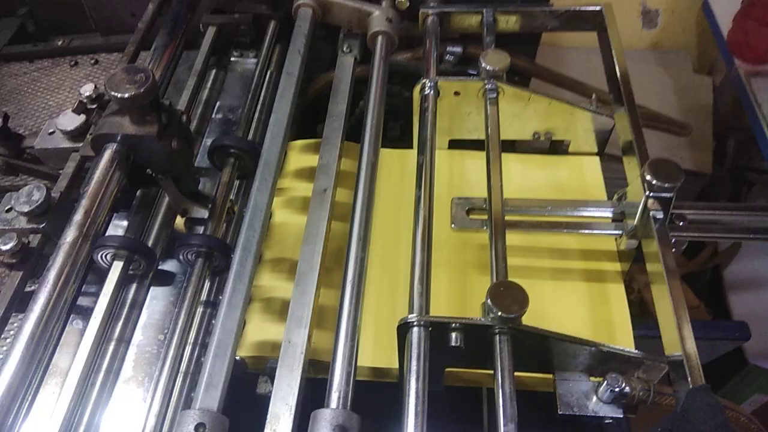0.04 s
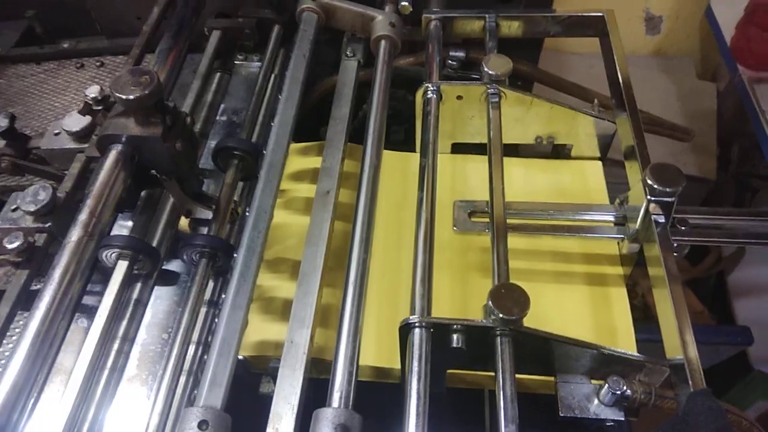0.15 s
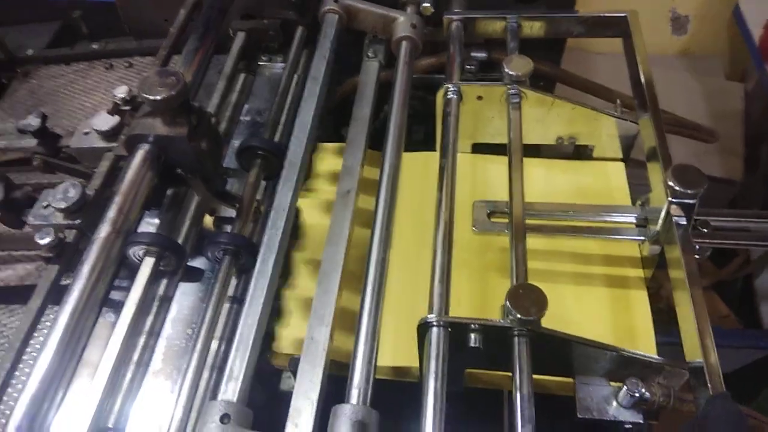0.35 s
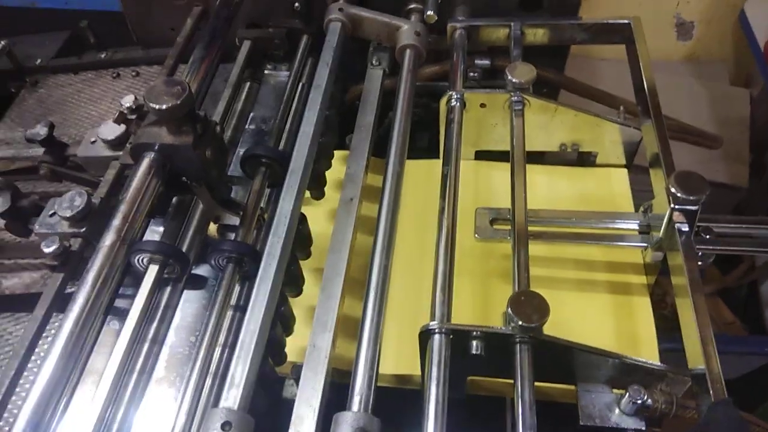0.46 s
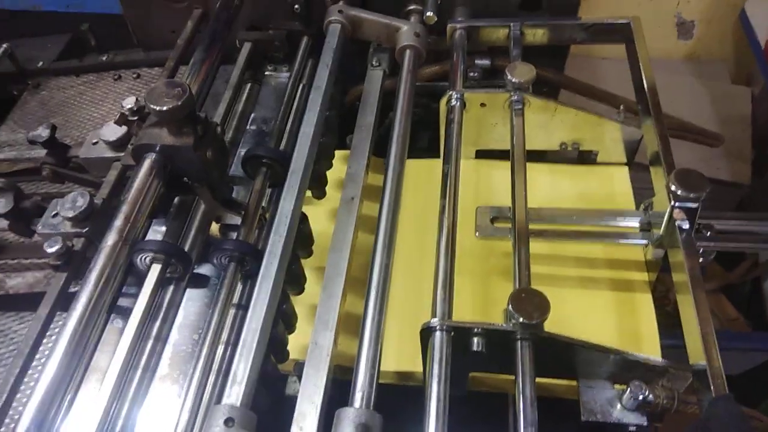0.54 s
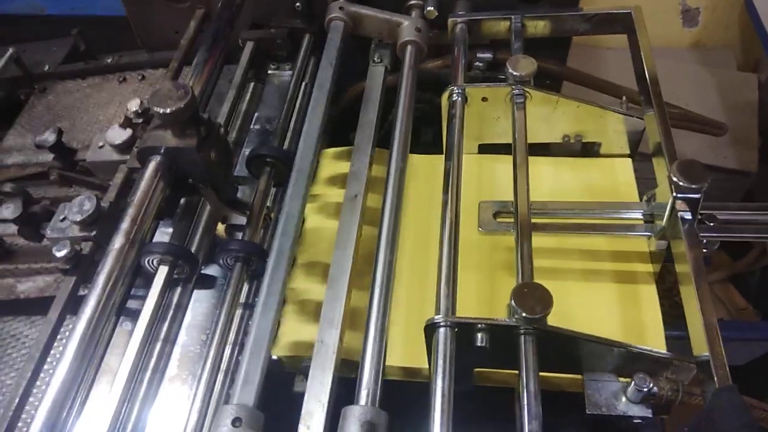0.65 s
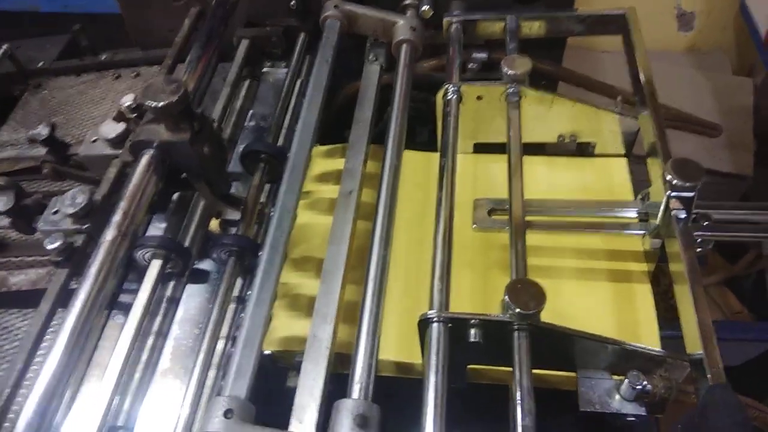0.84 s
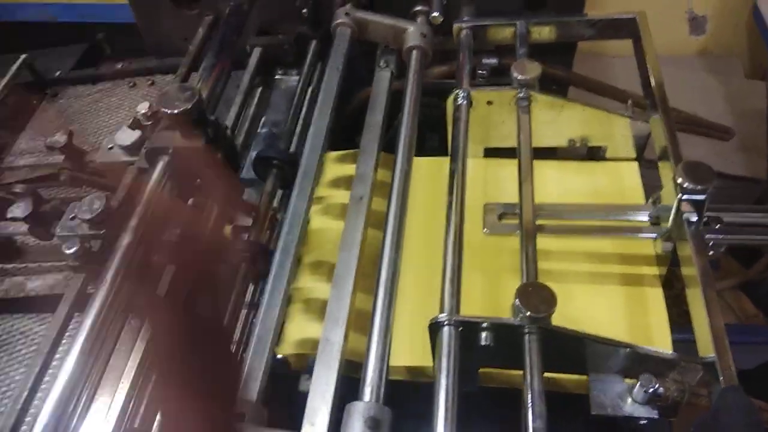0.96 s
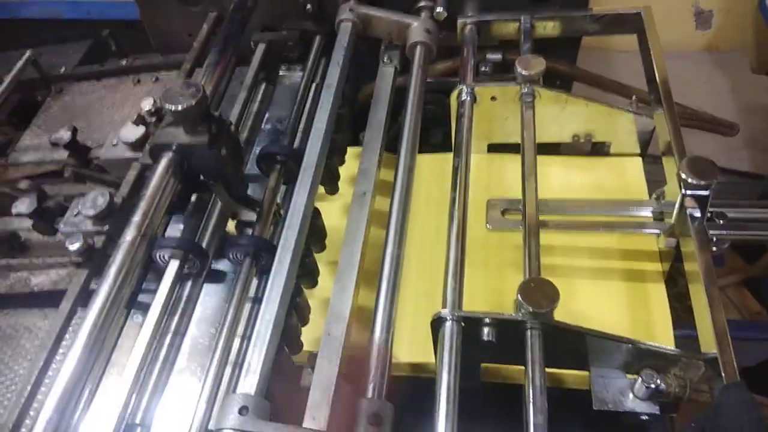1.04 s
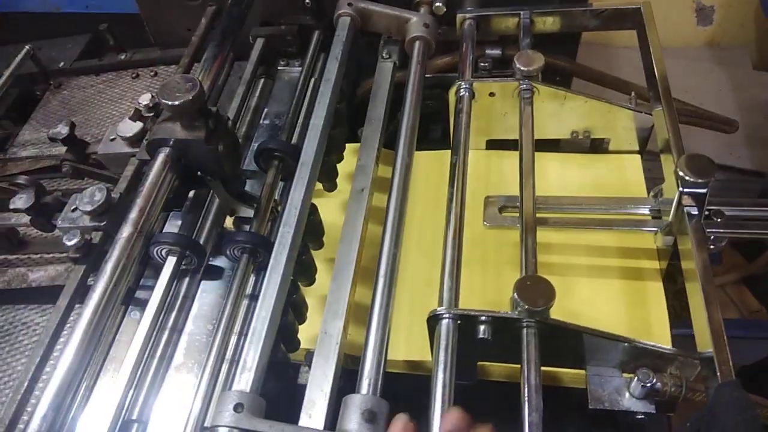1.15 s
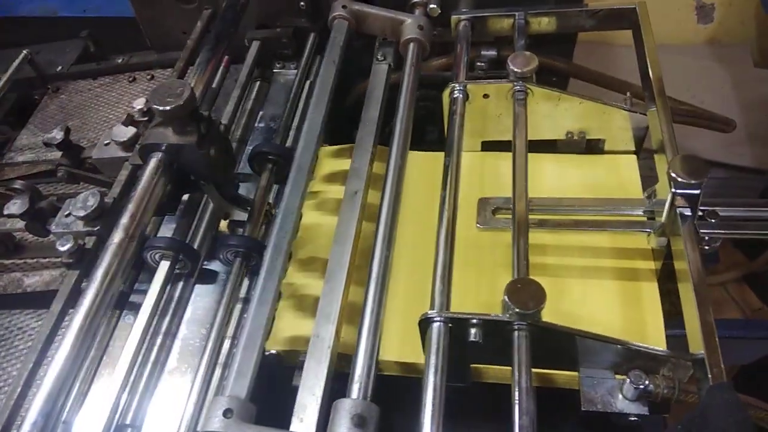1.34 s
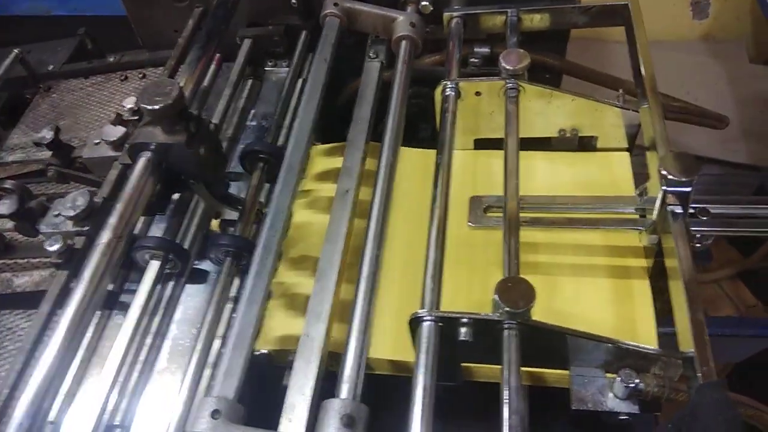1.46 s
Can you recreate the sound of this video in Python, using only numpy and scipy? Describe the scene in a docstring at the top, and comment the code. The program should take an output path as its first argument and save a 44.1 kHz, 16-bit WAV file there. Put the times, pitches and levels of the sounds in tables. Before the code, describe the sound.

An offset press feeder draws air with a pulsing buzz, cuts off, clanks and fades

```python
"""In a print shop, close by the sheet feeder of an offset press, through one feeding cycle.
Up front the suckers draw air: pulsing noise and vane-pump harmonics, then a hollow ring as they close.
The sheet slides in as fluttering bands of noise; levers clunk and ring, small steel parts tick in
noise bursts, and dry pivots squeak as unsteady gliding tones.
Behind them lie short shop reflections of the steel and the steady noise of the running drive."""
import sys
import numpy as np
from scipy import signal
from scipy.fft import rfft, irfft
from scipy.io import wavfile

SR = 44100
rng = np.random.default_rng(int(sys.argv[2]) if len(sys.argv) > 2 else 0)


def inscribe(sig):
    """Save sig as 16-bit PCM at rate SR to the path in sys.argv[1].

    A 1-D sig is mono; a 2-D sig holds one channel per row.
    Samples are clipped to [-1, 1] before scaling.
    """
    pcm = np.round(np.clip(np.atleast_2d(sig).T, -1, 1) * 32767)
    wavfile.write(sys.argv[1], SR, pcm.astype(np.int16))


N = 66150
TIME = np.arange(N) / SR  # [s]

# Vane pump harmonics, against each other: (multiple of vane rate, level [dB])
PUMP_HARMONICS = [(1, -12.5), (2, 0), (3, 2.5), (4, -3), (5, -7.5), (6, -16), (7, -11.5), (8, -12.5)]
# Air drawn through the suckers: (time [s], level [dB])
SUCTION_FLOW = [(.07, -20.5), (.1, -7), (.2, -1.5), (.26, 2), (.35, 2), (.5, 4.5), (.62, 2), (.68, 3.5),
                (.725, 1), (.76, -28.5), (.85, -47.5), (.95, -61)]
# Spectrum of the rushing air: (frequency [Hz], density [dB per Hz])
RUSH_SPECTRUM = [(40, -30), (110, -28), (150, -18), (185, -6), (250, -7), (380, 3.5), (680, 1.5),
                 (1050, -2), (1400, 1.5), (1800, -2.5), (2300, 1), (3300, -3), (4400, 1), (4900, -0.5),
                 (5900, 0), (7500, -4)]
# Tubes and plates ringing in the air stream: (frequency [Hz], width [Hz], level at 0 dB flow [dB])
PLATE_RESONANCES = [(277.7, 22, -41), (394, 19, -37), (473, 28, -40.5), (1268, 35, -41.5), (1499, 14, -38),
                    (2163, 66, -38.5), (2300, 180, -38.5), (2870, 12, -39), (4275, 13, -36.5),
                    (5660, 30, -37), (5880, 25, -44)]
# Pump hum through the frame, before its load: (multiple of vane rate, level [dB])
HUM_HARMONICS = [(2, -56), (3, -55)]
# Hum following the load on the pump: (time [s], level [dB])
HUM_LOAD_LEVEL = [(.8, -3), (.97, 5), (1.02, 1.5), (1.11, 6.5), (1.16, -6), (1.2, 4), (1.225, -15),
                  (1.3, 0), (1.5, -5.5)]
# Hollow ring of the air line as the suckers close: (time [s], level [dB])
CLOSING_LEVEL = [(.66, -71), (.715, -35), (.78, -32), (.84, -50.5), (.95, -66)]
# Blower hiss: (time [s], level [dB])
BLOWER_LEVEL = [(.07, -46), (.7, -17), (.8, -23), (.9, -26), (1.0, -32.5), (1.08, -25.5), (1.13, -25.5),
                (1.18, -26), (1.21, -35.5), (1.31, -36), (1.39, -47), (1.43, -37), (1.5, -43.5)]
# Spectrum of the hiss: (frequency [Hz], density [dB per Hz])
HISS_SPECTRUM = [(200, -28.5), (500, -15), (1000, -10), (1420, -8), (1750, -8), (2300, -5), (3500, -0.5),
                 (4300, 0.5), (4900, 0.5), (5800, 5.5), (7500, -2)]
# Sheet rubbing over the feed board: (time [s], level [dB])
SLIDE_LEVEL = [(.74, -55.5), (.82, -28), (.88, -28), (.92, -22), (.96, -24), (1.0, -28.5), (1.06, -28.5),
               (1.09, -45.5), (1.2, -45.5)]
# Spectrum of the rubbing paper: (frequency [Hz], density [dB per Hz])
PAPER_SPECTRUM = [(600, -40.5), (2000, -13.5), (2800, -8), (3400, -3), (3780, 3), (4100, -8), (7000, -16.5)]
# Lever clunks: (time [s], level [dB], 60 dB decay [s], low thud against the clank [dB])
LEVER_CLUNKS = [(0.078, -29.5, 0.46, -22), (0.436, -22, 0.045, 7), (.465, -19.5, 0.11, -32.5),
                (0.661, -19, .1, -3), (0.677, -31.5, 0.15, 8.5), (0.713, -18.5, 0.19, -7.5),
                (0.807, -30, 0.14, -17), (1.091, -19, 0.22, -25.5), (1.131, -34.5, 0.19, -32),
                (1.231, -40, 0.6, -19), (1.285, -30, 0.25, -12), (1.331, -33, 0.23, -20),
                (1.342, -31.5, 0.11, -11)]
# Spectrum of the clank: (frequency [Hz], density [dB per Hz])
CLANK_SPECTRUM = [(300, -32), (850, -24), (1080, -13.5), (1280, -15.5), (1650, -3.5), (2250, -3.5),
                  (2800, -8), (3600, -11), (4500, -18), (7500, -32)]
# Spectrum of the thud: (frequency [Hz], density [dB per Hz])
THUD_SPECTRUM = [(100, -39.5), (330, -4), (550, -8), (720, 4.5), (880, -19), (1300, 0), (2000, -29.5),
                 (6000, -57)]
# Ringing modes of a lever, against each other: (frequency [Hz], level [dB], 60 dB decay [s])
LEVER_MODES = [(537, -13, 0.23), (688, -12.5, 0.058), (1082, -12, 0.21), (1640, -15.5, 0.13),
               (1863, -9.5, 0.05), (1960, -11.5, 0.13), (2210, -8, .15), (2254, -0.5, 0.16),
               (2422, -1, 0.1), (2630, -12.5, .2)]
# Ticks of small steel parts: (time [s], level [dB])
STEEL_TICKS = [(0.244, -20), (.287, -26), (.316, -18.5), (.385, -17.5), (.846, -24.5), (.906, -25.5),
               (.924, -22.5), (1.04, -29.5), (1.055, -25), (1.157, -22.5), (1.173, -25.5), (1.408, -32.5)]
# Spectrum of a tick: (frequency [Hz], density [dB per Hz])
TICK_SPECTRUM = [(800, -36), (2500, -29.5), (3400, -5.5), (3640, -23.5), (3770, -1), (3950, -13),
                 (4350, -10.5), (4900, -24.5), (7500, -30.5)]
# Squeaks of dry pivots: (time [s], length [s], first pitch [Hz], last pitch [Hz], level [dB])
PIVOT_SQUEAKS = [(.237, 0.13, 3775, 3755, -26.5), (0.359, 0.074, 3700, 3736, -24.5),
                 (0.468, 0.029, 2335, 2316, -18.5), (0.709, 0.029, 1450, 1453, -20.5),
                 (0.767, 0.055, 1660, 1628, -30.5), (0.794, 0.053, 1010, 1016, -38),
                 (1.24, 0.06, 2423, 2250, -37.5), (1.341, 0.073, 1858, 1629, -36.5),
                 (1.436, 0.04, 2303, 2210, -45)]
# Spectrum of the running drive: (frequency [Hz], density [dB per Hz])
DRIVE_SPECTRUM = [(25, -20), (75, -20), (110, -14.5), (160, -22), (230, -7), (380, -2), (650, -2),
                  (1000, -6.5), (2300, -2.5), (7000, -26)]
# Microphone response: (frequency [Hz], gain [dB])
MIC_RESPONSE = [(20, -8.5), (3850, -1), (4010, -10.5), (4200, -3.5), (6300, -4.5), (6900, -8),
                (7400, -15.5), (7800, -36), (8200, -67)]

PUMP_HZ, PUMP_WOBBLE = 180.6, 0.0036  # vane rate and its rms unsteadiness, as a fraction
BUZZ_DB, BUZZ_GROWTH = -27.5, 1.72  # level at 0 dB flow; power of the flow
RUSH_DB, RUSH_PULSING = -17, 0.15  # level at 0 dB flow; depth of the vane pulses
CLOSING_HZ, CLOSING_WANDER_HZ = 362, 7.4  # pitch and its rms wander
CLUNK_RISE_S, RING_DB = .009, -3  # the ring's level is against the clank
TICK_RISE_S, TICK_T60_S = .005, .06
SQUEAK_JITTER = 0.02  # rms pitch unsteadiness, as a fraction
ROOM_T60_S, ROOM_DB = 0.16, -9.5
DRIVE_DB = -47
BASS_CUT_HZ = 130
START_S, FADE_S, MIC_EDGE_HZ = .069, .0023, 8100


def pump():
    """Vanes buzz and pulse the air rushing into the suckers; hum follows and the closing air line rings."""
    vane_hz = PUMP_HZ * (1 + PUMP_WOBBLE * drift(rate_hz=35))
    phase = 2 * np.pi * np.cumsum(vane_hz) / SR
    flow = level(SUCTION_FLOW)

    buzz = unit(harmonics(phase, PUMP_HARMONICS)) * amp(0.66 * drift(rate_hz=25))
    vane_pulses = 1 + RUSH_PULSING * np.cos(phase)
    rush = noise(RUSH_SPECTRUM, vane_pulses * amp(0.89 * drift(rate_hz=270)))

    closing_hz = CLOSING_HZ + CLOSING_WANDER_HZ * drift(rate_hz=56)
    ring = np.sqrt(2) * np.sin(2 * np.pi * np.cumsum(closing_hz) / SR)

    # the buzz grows faster than the flow, so it stands out when the suction is strong
    suction = amp(BUZZ_DB) * flow ** BUZZ_GROWTH * buzz
    suction += flow * (amp(RUSH_DB) * rush + plates())
    hum = harmonics(phase, HUM_HARMONICS) * level(HUM_LOAD_LEVEL)
    return suction + hum + level(CLOSING_LEVEL) * ring


def harmonics(phase, orders):
    """Sums cosines locked to the vane rate, each at its rms level and a random phase."""
    out = np.zeros(N)
    for multiple, db in orders:
        start_phase = 2 * np.pi * rng.random()
        out += np.sqrt(2) * amp(db) * np.cos(round(multiple) * phase + start_phase)
    return out


def plates():
    """Turbulence, as white noise, keeps the narrow resonances of tubes and plates ringing."""
    f = np.fft.rfftfreq(N, 1 / SR)
    out = np.zeros(N)
    for hz, width_hz, db in PLATE_RESONANCES:
        resonance = 1 / (1 + (2 * (f - hz) / width_hz) ** 2)
        out += amp(db) * unit(irfft(rfft(rng.standard_normal(N)) * resonance, N))
    return out


def sheet():
    """Blower air flutters the pile as uneven hiss while the top sheet scrapes forward."""
    hiss = noise(HISS_SPECTRUM, amp(1.6 * drift(rate_hz=130)))
    scrape = noise(PAPER_SPECTRUM, amp(2.2 * drift(rate_hz=300)))
    return level(BLOWER_LEVEL) * hiss + level(SLIDE_LEVEL) * scrape


def levers():
    """Each lever lands with a noisy clank, a thud in the frame and a short ring of its steel modes."""
    out = np.zeros(N)
    for start, db, t60, thud_db in LEVER_CLUNKS:
        impact = noise(CLANK_SPECTRUM) + amp(thud_db) * noise(THUD_SPECTRUM)
        clank = impact * blow(start, CLUNK_RISE_S, t60)
        ring = np.zeros(N)
        for hz, mode_db, mode_t60 in LEVER_MODES:
            tone = np.sin(2 * np.pi * (hz * TIME + rng.random()))
            ring += amp(mode_db) * blow(start, CLUNK_RISE_S, mode_t60) * tone
        out += amp(db) * (clank + amp(RING_DB) * ring)
    return out


def ticks():
    """Small steel parts strike with a bright, quickly damped burst of noise."""
    out = np.zeros(N)
    for start, db in STEEL_TICKS:
        out += amp(db) * noise(TICK_SPECTRUM) * blow(start, TICK_RISE_S, TICK_T60_S)
    return out


def squeaks():
    """A dry pivot sticks and slips: an unsteady tone that swells quickly, glides in pitch and dies."""
    out = np.zeros(N)
    for start, length, first_hz, last_hz, db in PIVOT_SQUEAKS:
        progress = np.clip((TIME - start) / length, 0, 1)
        glide_hz = first_hz + (last_hz - first_hz) * progress
        hz = glide_hz * (1 + SQUEAK_JITTER * drift(rate_hz=274))
        swell = 4 * np.sqrt(progress) * (1 - progress)
        roughness = unit(amp(2.2 * drift(rate_hz=250)))
        out += amp(db) * swell * roughness * np.sin(2 * np.pi * np.cumsum(hz) / SR)
    return out


def shop(x):
    """Short diffuse reflections from the machine and the walls, as a decaying noise tail."""
    t = TIME[:SR // 2]
    decay = np.exp(-np.log(1000) * t / ROOM_T60_S)
    tail = rng.standard_normal(len(t)) * decay * (t > .004)  # first reflection after 4 ms
    return signal.fftconvolve(x, tail / np.linalg.norm(tail))[:N]


def drive():
    """The running drive is a steady bed of coloured noise."""
    return amp(DRIVE_DB) * noise(DRIVE_SPECTRUM)


def amp(db):
    """Decibels to gain."""
    return 10 ** (np.asarray(db) / 20)


def unit(x):
    """Scales to rms 1."""
    return x / np.sqrt(np.mean(x ** 2) + 1e-20)


def level(points):
    """Gain over time, straight in dB between (time [s], level [dB]) points."""
    return amp(np.interp(TIME, *np.transpose(points)))


def colour(x, points):
    """Filters by a (frequency [Hz], gain [dB]) curve on a log frequency axis."""
    hz, db = np.transpose(points)
    f = np.fft.rfftfreq(2 * N, 1 / SR)
    gain = amp(np.interp(np.log(f + 1), np.log(hz + 1), db))
    return irfft(rfft(x, 2 * N) * gain)[:N]


def noise(points, grain=1):
    """Coloured noise of rms 1, its strength shaped by an optional grain before the filter."""
    return unit(colour(grain * rng.standard_normal(N), points))


def drift(rate_hz):
    """Smooth random motion of rms 1, fading out around a rate."""
    f = np.fft.rfftfreq(N, 1 / SR)
    lowpass = np.exp(-(f / rate_hz) ** 2) * (f > 0)
    return unit(irfft(rfft(rng.standard_normal(N)) * lowpass, N))


def blow(start, rise, t60):
    """Envelope of a blow: short linear rise, then exponential decay by 60 dB in t60."""
    t = np.maximum(TIME - start, 0)
    decay = np.exp(-np.log(1000) * np.maximum(t - rise, 0) / t60)
    return np.minimum(t / rise, 1) * decay


def scene():
    """Air, paper and steel close by, all thin in the bass, over the running drive."""
    steel = levers() + ticks() + squeaks()
    feeder = pump() + sheet() + steel + amp(ROOM_DB) * shop(steel)
    bass_cut = signal.butter(2, BASS_CUT_HZ, "high", fs=SR, output="sos")
    thin = signal.sosfilt(bass_cut, feeder)
    return (thin + drive())[None]


def record(dry):
    """The sound opens from silence through a narrow-band microphone with a steep upper edge."""
    opening = np.clip((TIME - START_S) / FADE_S, 0, 1)
    x = colour(dry[0] * opening, MIC_RESPONSE)
    lowpass = signal.firwin(511, MIC_EDGE_HZ, window=("kaiser", 9), fs=SR)
    return signal.oaconvolve(x, lowpass, "same")[None]


dry = scene()
out = record(dry)
inscribe(out)
```